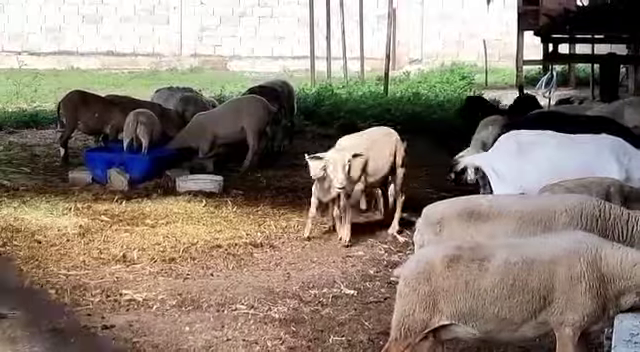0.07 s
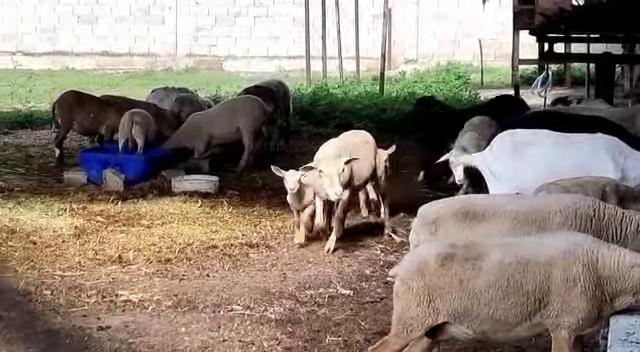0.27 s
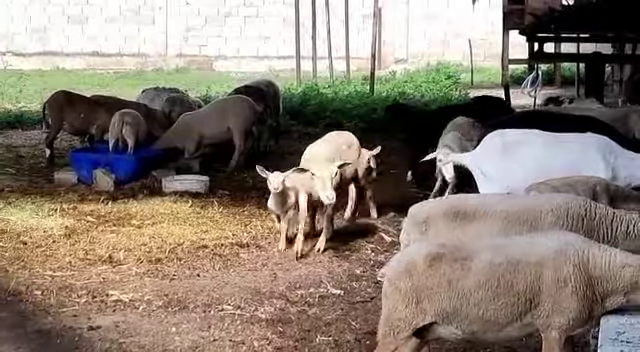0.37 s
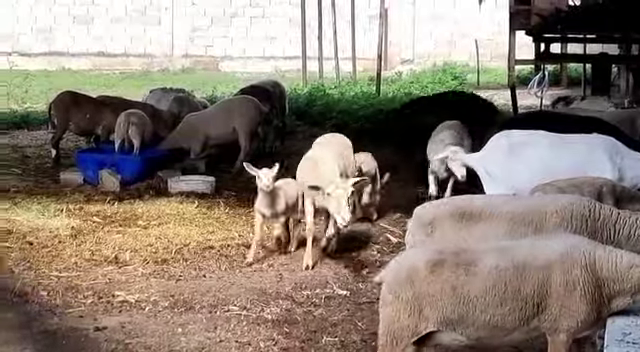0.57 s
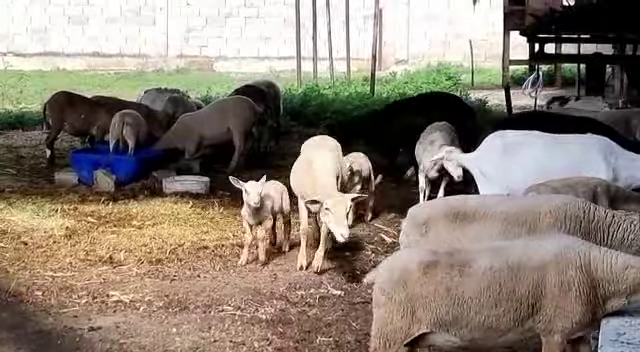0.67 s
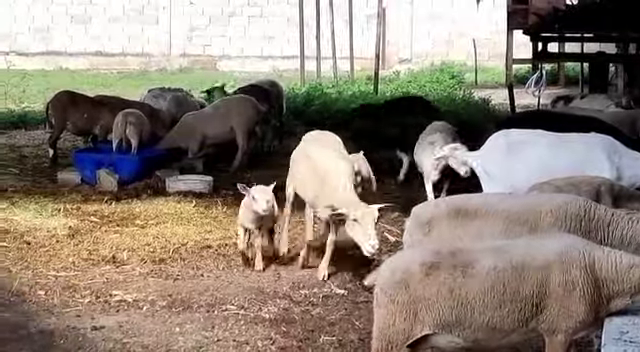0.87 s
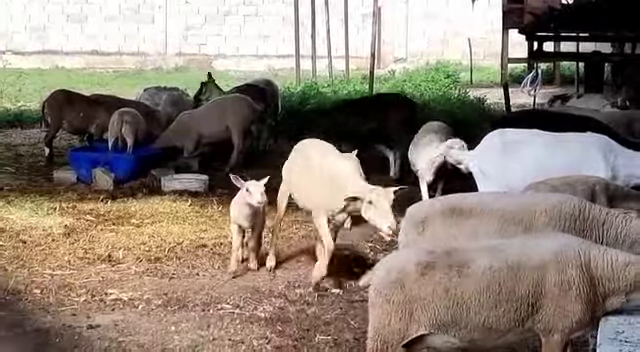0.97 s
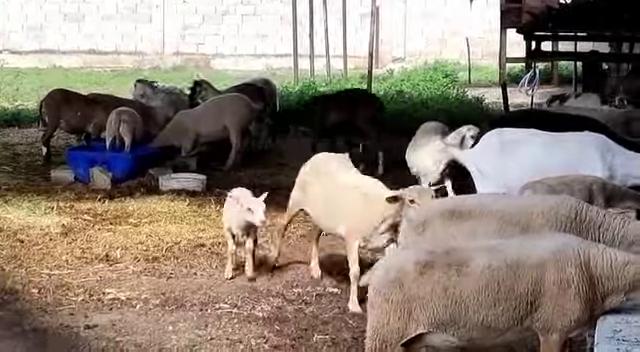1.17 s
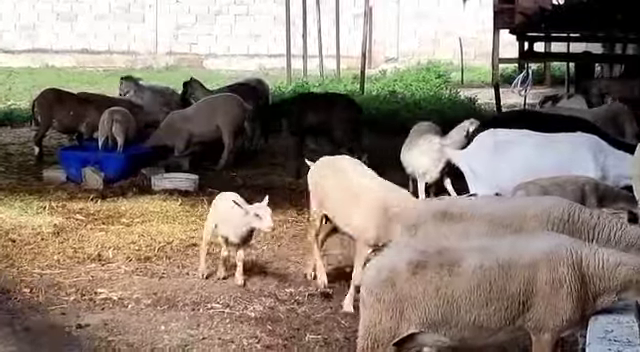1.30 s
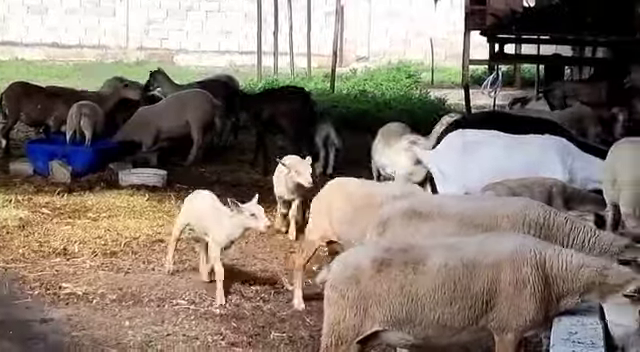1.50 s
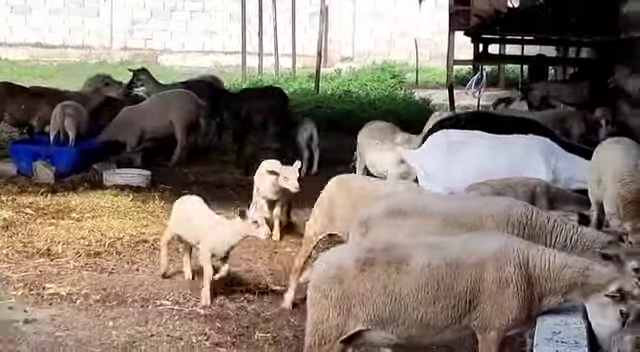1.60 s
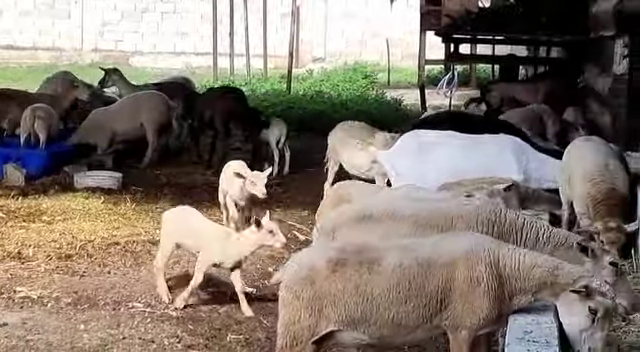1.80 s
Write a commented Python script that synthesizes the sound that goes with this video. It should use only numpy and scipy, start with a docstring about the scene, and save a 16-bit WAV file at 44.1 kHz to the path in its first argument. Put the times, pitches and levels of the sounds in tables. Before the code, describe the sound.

Sharp, ringing knocks on something hard close by, over a low farmyard rumble.

```python
"""Knocks on something hard, close by, in a sheep pen under a shed roof: four in even rhythm, a quick
cluster, then a light one. Each is a contact snap, a brief clatter of tiny contacts and ringing modes;
the shed echoes and rings on. Feet scuff in the straw (swells of hiss). Behind: low rumble,
a motor-like hum, a faint whine and yard air."""
import sys
import numpy as np
from scipy import signal
from scipy.fft import rfft, irfft, next_fast_len
from scipy.io import wavfile

SR = 44100
rng = np.random.default_rng(int(sys.argv[2]) if len(sys.argv) > 2 else 0)


def wrap_up_sound(samples):
    """Save the sound to the file named by the first command line argument, as 16-bit audio."""
    columns = np.atleast_2d(samples).T
    # keep every value between -1 and 1, then stretch to whole-number steps
    tamed = np.clip(columns, -1, 1)
    steps = np.round(tamed * 32767).astype(np.int16)
    wavfile.write(sys.argv[1], SR, steps)


N = 81585
TIME_S = np.arange(N) / SR
FFT_SIZE = 2 * next_fast_len(N // 2 + SR // 10, real=True)
FREQ_HZ = np.maximum(np.arange(FFT_SIZE // 2 + 1) * SR / FFT_SIZE, 1)

# Strikes: t/s, level/dB, clatter rise/s, clatter decay/s, snap/dB, clatter bass/dB, middle/dB,
# bright/dB, treble/dB, ring/dB, favoured low f/Hz, favoured high f/Hz
STRIKES = [(.228, -20.5, 0.0026, 0.0073, -17, -0.5, 0, 3, 3, -4.5, 590, 3700),
           (.377, -20, 0.0041, 0.01, -9, -2, 5, 4.5, 3, -2, 1085, 3620),
           (.508, -19.5, 0.0047, 0.012, -2, -2.5, 3.5, 6.5, 5, -2.5, 1690, 3700),
           (.632, -21.5, 0.0034, 0.0094, -12, 0, 4.5, 3.5, 2.5, 0, 880, 2850),
           (.888, -23.5, 0.0041, 0.028, -22, 3, -2, 1, 0.5, 0.5, 1270, 4420),
           (.9445, -11.5, 0.0016, 0.0071, -12, -4.5, 0.5, 1.5, 2, -4, 2265, 3545),
           (.964, -16.5, 0.0037, .012, -25, 6.5, 4, 8, 6, -1.5, 700, 3070),
           (1.482, -35, 0.0028, .006, -34, 2.5, 2.5, -6, -10, 6, 2655, 3545)]
SNAP_SPECTRUM = [(500, 3.5), (2000, 2), (4000, 8), (7000, -7), (9300, -42), (12500, -3), (15500, -1)]  # first contact: f/Hz, level/dB
CLATTER_SPECTRUM = [(120, -17), (300, -17.5), (470, -6.5), (640, -14), (800, -4.5), (980, -13.5),
                    (1200, -9), (1500, -10), (1690, -2.5), (2600, -2.5), (3600, 0.5), (4400, 0.5),
                    (5200, -12), (6200, -13), (7300, -15.5), (9300, -32.5), (12500, -23.5), (15500, -26.5)]  # tiny contacts: f/Hz, level/dB
BODY_RESONANCES = [(1093, 133, 10), (2180, 180, 1), (2870, 170, 4.5), (3560, 110, 3.5), (3656, 260, 6)]  # broad peaks of the struck body: f/Hz, width/Hz, lift/dB
BODY_MODES = [(590, -22, 0.33), (700, -22.5, 0.43), (880, -18, 0.16), (1085, -23.5, 0.26),
              (1270, -20.5, 0.22), (1690, -20, 0.15), (1921, -22.5, 0.26), (2265, -18.5, .22),
              (2655, -17, 0.081), (2850, -19, 0.11), (3070, -18.5, 0.11), (3220, -23, 0.14),
              (3545, -20.5, 0.12), (3620, -29, 1), (3700, -24, 0.24), (3880, -28, 0.24), (3890, -17.5, .3),
              (4420, -16.5, 0.17)]  # its ringing modes: f/Hz, level/dB, t60/s
SHED_BANDS = [(252, 6.5, 1), (824, -1, 0.68), (2760, -5, 0.65), (3560, -5, 0.8), (4400, -5, 0.63),
              (6300, -3.5, 0.53), (13000, -10, 0.9)]  # diffuse ring: f/Hz, level/dB, t60/s
KNOCK_BALANCE = [(150, 7.5), (500, -5), (870, 1.5), (1200, -9), (1900, -4.5), (2500, -4.5), (3000, -14),
                 (3600, -13), (4400, -9.5), (5400, 0), (6500, 1), (9000, 14.5), (13000, 0.5)]  # left over right: f/Hz, level/dB
FOOT_SCUFFS = [(.005, -46.5, 0.011, 0.048), (.147, -43.5, .025, .11), (.745, -39.5, .058, .033),
               (1.536, -48, 0.007, 0.048), (1.588, -49, 0.045, 0.07)]  # drags in straw: t/s, level/dB, rise/s, decay/s
HUM_HARMONICS = [(1, -9), (2, -0.5), (3, -16.5), (4, -18.5)]  # hum partials: multiple, level/dB
# Noise spectra: f/Hz, level/dB
STRAW_SPECTRUM = [(500, -32), (1500, -25), (2800, 4), (3250, -1.5), (3650, 6.5), (4700, 1), (5300, -2),
                  (6000, -24), (7500, -14), (9500, -31), (12500, -24.5), (15500, -28)]
RUMBLE_SPECTRUM = [(15, -48), (26, -30), (40, -30), (60, 3.5), (90, -2.5), (125, 2), (170, -8.5),
                   (260, -11.5), (400, -22.5), (900, -29), (3000, -57)]
UPPER_RUMBLE_SPECTRUM = [(60, -36.5), (150, 11), (260, 3.5), (420, -3.5), (800, -23.5), (2000, -58)]
AIR_SPECTRUM = [(100, 2.5), (350, -4), (700, -6), (1300, -7.5), (2300, -9.5), (3600, -8), (5500, -19.5),
                (9000, -35), (15500, -57)]
# Background envelopes: t/s, level/dB
RUMBLE_ENVELOPE = [(0, -37.5), (.12, -40.5), (.3, -41), (.88, -40), (1.05, -45), (1.3, -44.5),
                   (1.39, -41.5), (1.47, -45.5), (1.65, -47), (1.85, -45)]
UPPER_RUMBLE_ENVELOPE = [(0, -81), (.3, -45), (.65, -39), (.9, -43.5), (1.25, -51), (1.85, -72)]
HUM_ENVELOPE = [(0, -36.5), (.3, -37.5), (.5, -53), (.9, -48), (1.1, -43), (1.28, -46), (1.39, -37.5),
                (1.48, -45.5), (1.57, -42), (1.68, -52.5), (1.85, -41)]
AIR_ENVELOPE = [(0, -47.5), (.8, -37), (1.4, -48.5), (1.85, -51.5)]


def snaps(rise_s=0.00036, decay_s=0.0023):
    """First hard contact of each knock: a few ms of bright noise."""
    force = sum(from_db(db + snap_db) * swell(t_s, rise_s, decay_s)
                for t_s, db, _, _, snap_db, *_ in STRIKES)
    return colour(force * rng.standard_normal(N), unit_gain(at_hz(SNAP_SPECTRUM)))


def ringing(favour_db=9, scatter_db=1):
    """Each knock excites the body's damped modes, some favoured by the struck spot."""
    times_s, knock_db, *_, ring_db, low_hz, high_hz = np.transpose(STRIKES)
    out = 0
    for hz, mode_db, t60_s in BODY_MODES:
        onsets = ((times_s + rng.random(len(times_s)) / hz) * SR).astype(int)  # random phase
        push_db = knock_db + ring_db + mode_db + favour_db * favour(hz, (low_hz, high_hz))
        pushes = np.zeros(N)
        pushes[onsets] = from_db(push_db + scatter_db * rng.standard_normal(len(times_s)))
        radius, step_rad = from_db(-60 / (t60_s * SR)), 2 * np.pi * hz / SR
        feedback = [1, -2 * radius * np.cos(step_rad), radius ** 2]
        out = out + signal.lfilter([0, np.sin(step_rad)], feedback, pushes + 1e-18)
    return out


def clatter(contacts_per_s=3000, favour_db=4.5):
    """A dying burst of tiny contacts per knock, sounding in the body and the shed."""
    peaks_db = sum(lift_db / (1 + (2 * (FREQ_HZ - hz) / width_hz) ** 2)
                   for hz, width_hz, lift_db in BODY_RESONANCES)
    body_db = at_hz(CLATTER_SPECTRUM) + peaks_db
    out = 0
    for t_s, db, rise_s, decay_s, _, bass_db, middle_db, bright_db, treble_db, _, *spots_hz in STRIKES:
        force = swell(t_s, rise_s, decay_s)
        impulses = (rng.random(N) < contacts_per_s / SR) * rng.choice([-1, 1], N)
        contacts = unit_rms(impulses * force) * np.sqrt(np.mean(force ** 2))
        tone_db = at_hz([(746, bass_db), (2110, middle_db), (3530, 0),
                         (5020, bright_db), (11400, treble_db)])
        tone_db += favour_db * favour(FREQ_HZ, spots_hz)
        burst = left_first(contacts) + shed_ring(force ** 2)
        out = out + from_db(db) * colour(burst, unit_gain(body_db + tone_db))
    return out


def favour(hz, spots_hz, width_hz=50):
    """Nearness, 0-1, to the frequencies a struck spot brings out."""
    return sum(np.exp(-((hz - spot_hz) / width_hz) ** 2) for spot_hz in spots_hz)


def left_first(x, lag_s=0.000522):
    """Direct sound reaches the right side later."""
    return np.array([x, delay(x, lag_s)])


def side_colour(x):
    """Each side hears the knocks with its own colour."""
    tilt_db = at_hz(KNOCK_BALANCE) / 2
    return np.array([colour(x[0], tilt_db), colour(x[1], -tilt_db)])


def shed_ring(power, near_db=0.5):
    """Near-wall scatter, then a diffuse ring, longest in the bass."""
    white = rfft(rng.standard_normal((2, N)), FFT_SIZE)
    arriving = linger(power, t60_s=0.016)
    near = from_db(near_db) ** 2 * linger(arriving, t60_s=0.24)
    out = 0
    for hz, db, t60_s in SHED_BANDS:
        share = at_hz([(centre_hz, centre_hz == hz) for centre_hz, *_ in SHED_BANDS])
        band = irfft(white * share, FFT_SIZE)[:, :N]
        out = out + band * np.sqrt(near + from_db(db) ** 2 * linger(arriving, t60_s))
    return out


def echoes(x, count=6, span_s=(0.005, 0.03), gain_db=-20.5):
    """Reflections from posts and rails comb the knocks."""
    lags_s = rng.uniform(*span_s, count)
    reflected = np.array([sum(delay(side, lag_s) for lag_s in lags_s) for side in x])
    return x + from_db(gain_db) * reflected


def far_wall(x, lag_s=0.069, gain_db=-15, corner_hz=5000):
    """One late, dull slap off the far wall."""
    late = np.array([delay(side, lag_s) for side in x])
    return x + colour(late, gain_db - 10 * np.log10(1 + (FREQ_HZ / corner_hz) ** 2))


def scuffs():
    """Feet drag through straw: soft swells of hiss."""
    power = sum((from_db(db) * swell(t_s, rise_s, decay_s)) ** 2
                for t_s, db, rise_s, decay_s in FOOT_SCUFFS)
    return np.sqrt(power) * stereo_noise(STRAW_SPECTRUM, correlation=0.11) * pan(left_db=-4)


def rumble():
    """Deep mono noise under a wider, higher swell."""
    deep = envelope(RUMBLE_ENVELOPE) * stereo_noise(RUMBLE_SPECTRUM, correlation=1)
    upper = envelope(UPPER_RUMBLE_ENVELOPE) * stereo_noise(UPPER_RUMBLE_SPECTRUM, correlation=0.38)
    return deep + upper * pan(left_db=-5)


def hum(pitch_hz=60.1, wander=0.012):
    """Motor-like harmonics on a slightly wavering pitch."""
    phase_rad = 2 * np.pi * np.cumsum(pitch_hz * (1 + wander * drift(corner_hz=4.5))) / SR
    tone = sum(from_db(db) * np.sin(k * phase_rad + 2 * np.pi * rng.random()) for k, db in HUM_HARMONICS)
    return envelope(HUM_ENVELOPE) * unit_rms(tone)


def whine(pitch_hz=700, level_db=-61.5, waver_db=2):
    """A faint tone swells and fades unsteadily."""
    gain = from_db(level_db + waver_db * drift(corner_hz=5.1))
    tone = unit_rms(np.sin(2 * np.pi * pitch_hz * TIME_S))
    return gain * swell(t_s=1.4, rise_s=0.23, decay_s=0.23) * tone


def yard_air():
    """Wide, soft broadband noise."""
    return envelope(AIR_ENVELOPE) * stereo_noise(AIR_SPECTRUM, correlation=0.038)


def from_db(db):
    """Decibels to gain."""
    return 10 ** (np.asarray(db) / 20)


def unit_rms(x):
    """Scale to rms 1."""
    return x / np.sqrt(np.mean(x ** 2) + 1e-20)


def unit_gain(db):
    """Offset a filter curve to preserve white-noise power."""
    return db - 10 * np.log10(np.mean(from_db(db) ** 2))


def at_hz(points):
    """Interpolate (f/Hz, value) points over log frequency."""
    hz, values = np.transpose(points)
    return np.interp(np.log(FREQ_HZ), np.log(hz), values)


def envelope(points):
    """Gain from (t/s, level/dB) points."""
    return from_db(np.interp(TIME_S, *np.transpose(points)))


def swell(t_s, rise_s, decay_s):
    """Exponential rise to 1 at t_s, then exponential decay."""
    exponent = np.maximum((t_s - TIME_S) / rise_s, (TIME_S - t_s) / decay_s)
    return np.exp(-np.minimum(exponent, 20))


def linger(power, t60_s):
    """Stored energy leaks away, 60 dB in t60_s."""
    retained = from_db(-120 / (t60_s * SR))
    return signal.lfilter([1 - retained], [1, -retained], power + 1e-18)


def delay(x, lag_s):
    """Fractional delay."""
    return np.interp(TIME_S - lag_s, TIME_S, x)


def pan(left_db):
    """Stereo gains, opposite in dB."""
    return from_db([[left_db], [-left_db]])


def colour(x, db):
    """Minimum-phase filter from a gain curve on FREQ_HZ."""
    cepstrum = irfft(db * np.log(10) / 20, FFT_SIZE)
    cepstrum[1:FFT_SIZE // 2] *= 2
    cepstrum[FFT_SIZE // 2 + 1:] = 0
    return irfft(rfft(x, FFT_SIZE) * np.exp(rfft(cepstrum)), FFT_SIZE)[..., :N]


def stereo_noise(spectrum, correlation):
    """Coloured noise shared in part by both sides; rms 1."""
    mid, side = rng.standard_normal((2, N))
    white = np.sqrt(1 + correlation) * mid + np.sqrt(1 - correlation) * side * [[1], [-1]]
    return unit_rms(colour(white, at_hz(spectrum)))


def drift(corner_hz):
    """Slow random wander; rms 1."""
    return unit_rms(colour(rng.standard_normal(N), -20 * np.log10(1 + (FREQ_HZ / corner_hz) ** 2)))


def scene():
    """Knocks in the shed, scuffs, background."""
    knocks = left_first(snaps() + ringing()) + clatter()
    foreground = side_colour(far_wall(echoes(knocks))) + scuffs()
    background = rumble() + hum() + whine() + yard_air()
    return foreground + background * pan(left_db=-1.5)


def record(dry):
    """Peak clipping, then a steep low-pass."""
    clip_level, cutoff_hz = 0.9, 15870
    lowpass = signal.ellip(10, 0.05, 60, cutoff_hz, fs=SR, output="sos")
    return signal.sosfiltfilt(lowpass, np.clip(dry, -clip_level, clip_level))


dry = scene()
out = record(dry)
wrap_up_sound(out)
```